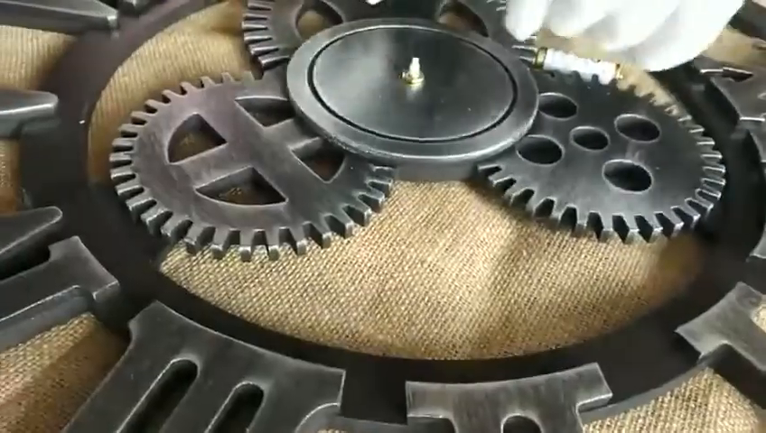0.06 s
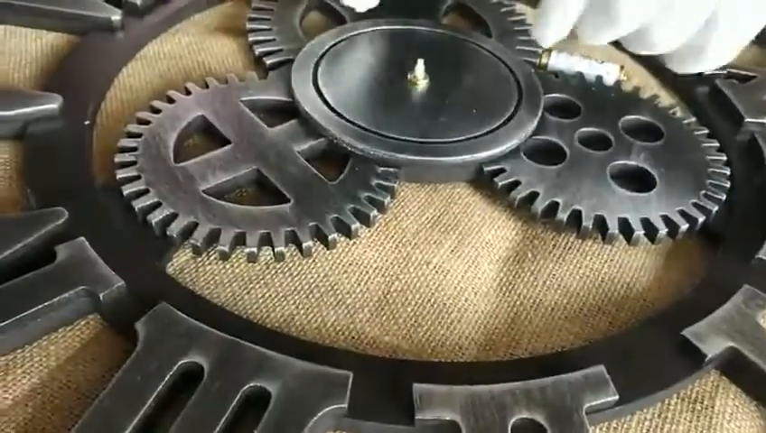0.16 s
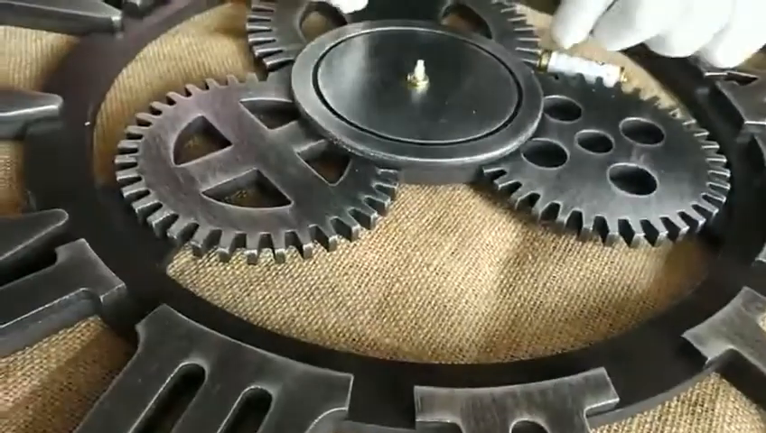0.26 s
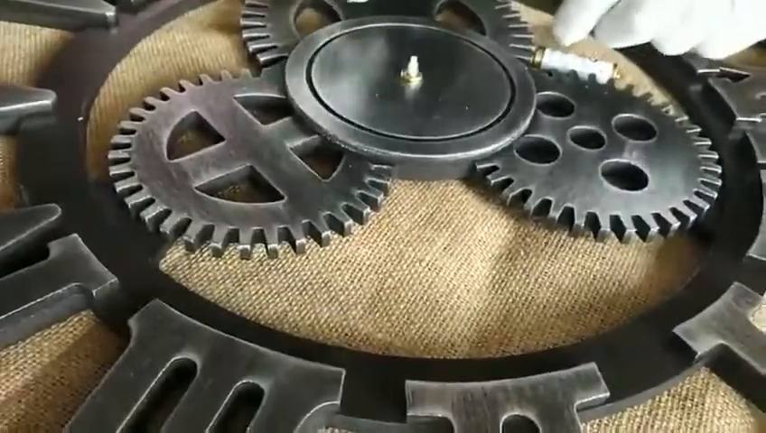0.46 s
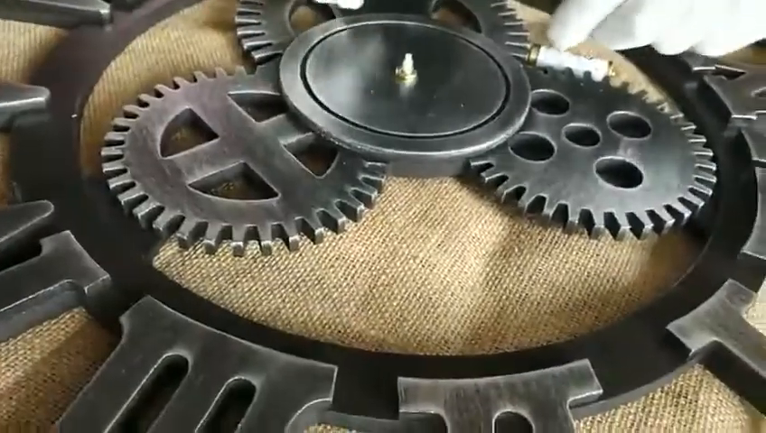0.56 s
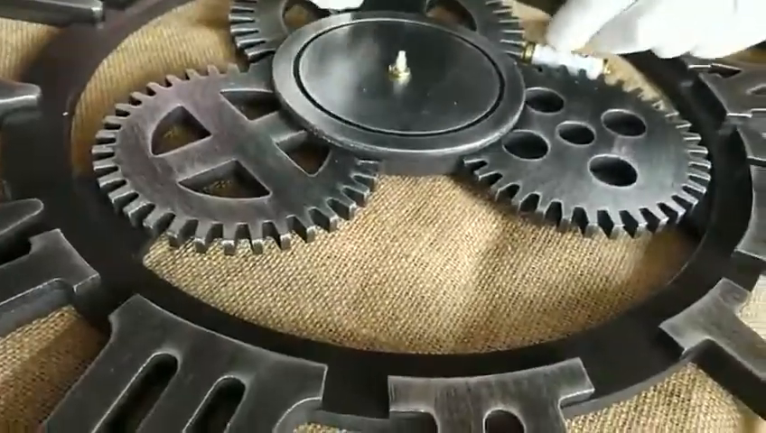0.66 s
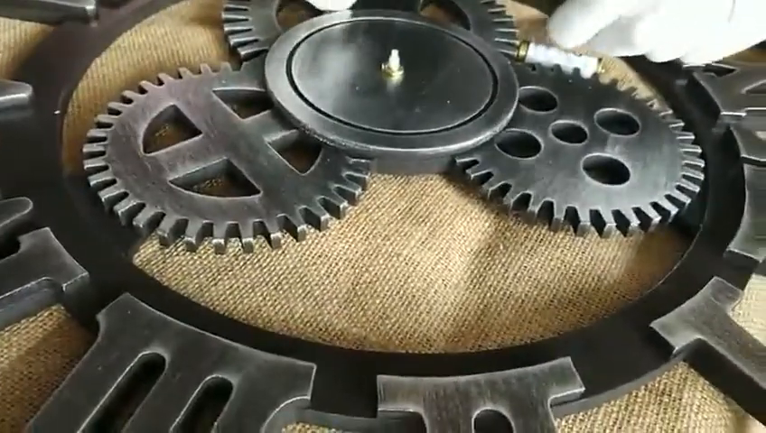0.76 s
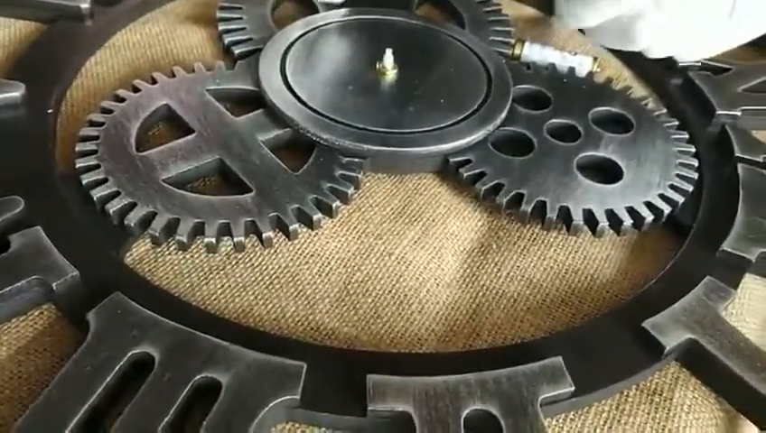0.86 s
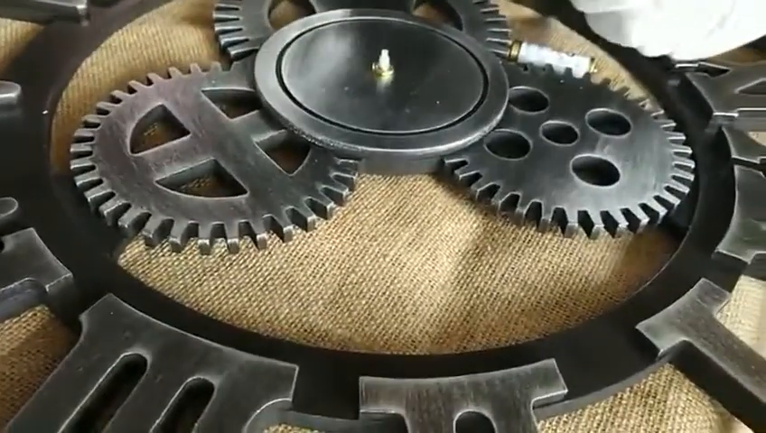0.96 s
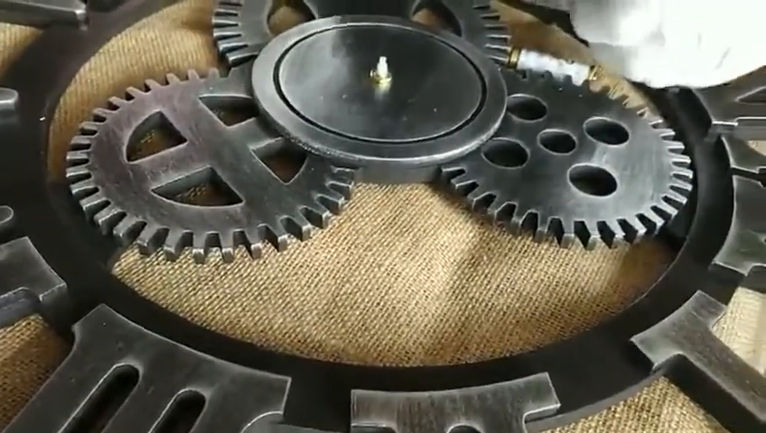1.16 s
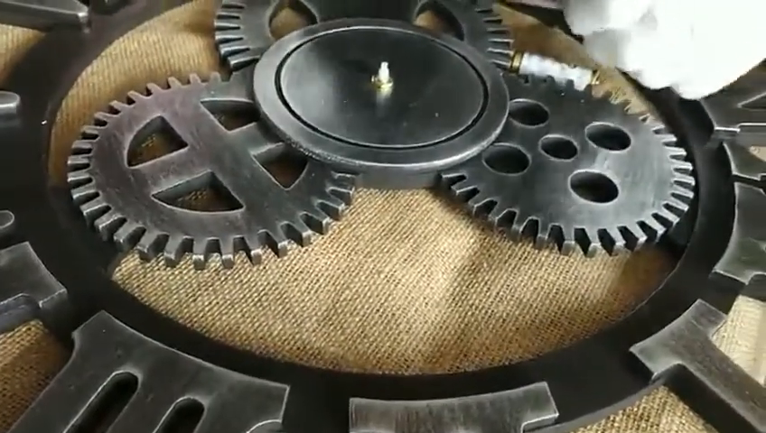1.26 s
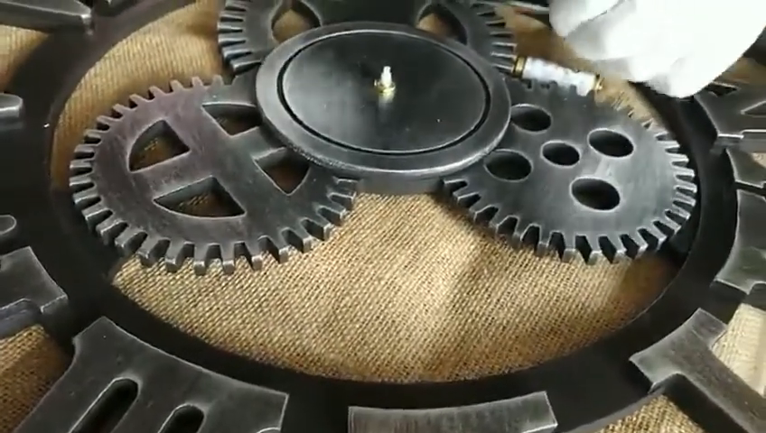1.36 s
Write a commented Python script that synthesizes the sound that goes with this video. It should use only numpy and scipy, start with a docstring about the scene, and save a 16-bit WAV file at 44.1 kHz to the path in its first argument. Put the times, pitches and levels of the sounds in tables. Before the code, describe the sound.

Metal gears handled up close: a dull bump, then a small ping, light ticks and clacks.

```python
"""Gloved hands work on a metal gear clock close to the microphone. The glove rubs over the gears,
a small metal part pings, metal scrapes on metal, and light ticks and firmer clacks ring the gears.
Just before the ping, something heavy bumps farther off, twice in quick succession, and the room answers.
Under it all runs the low rush of the quiet room's ventilation."""
import sys
import numpy as np
from scipy import signal
from scipy.fft import rfft, irfft, next_fast_len
from scipy.io import wavfile
from scipy.ndimage import map_coordinates

SR = 44100
rng = np.random.default_rng(int(sys.argv[2]) if len(sys.argv) > 2 else 0)


def generate_wav(sig):
    """Save sig (samples, or channels by samples) to the path in sys.argv[1] as 16-bit PCM at SR."""
    pcm = np.round(np.clip(np.atleast_2d(sig).T, -1, 1) * 32767).astype(np.int16)
    wavfile.write(sys.argv[1], SR, pcm)


N = 61739

# tone of the ventilation rush (frequency [Hz], relative level [dB])
AIR_TONE = [(25, -44), (60, -31.5), (120, -23), (150, -13.5), (195, 0), (260, -2), (300, -4), (380, -8.5),
            (470, -12), (650, -16), (1000, -21.5), (1700, -28), (2400, -29), (4000, -32), (8200, -33),
            (15000, -35)]
# how alike the rush is on both sides (frequency [Hz], likeness [0 to 1])
AIR_LIKENESS = [(50, 0.52), (120, 0.49), (180, 0.99), (300, 0.88), (440, 0.79), (650, 0.42), (1100, 0),
                (2000, 0), (8000, 0.023)]
# which side the ventilation leans to (frequency [Hz], left over right [dB])
AIR_BALANCE = [(60, -9), (110, -11.5), (190, -3.5), (300, -2), (440, -2.5), (700, -3.5), (2000, -3.5),
               (8000, 1)]
# faint fan tones (frequency [Hz], level [dB])
FAN_TONES = [(200, -60.5), (297, -62)]
# glove strokes (time [s], length [s], level [dB])
GLOVE_STROKES = [(-.01, 0.056, -66), (.12, 0.076, -65.5), (0.329, 0.022, -62), (0.367, 0.097, -59),
                 (0.444, 0.037, -53.5), (0.867, 0.23, -59.5), (1.295, 0.15, -55.5)]
# tone of cloth on metal (frequency [Hz], relative level [dB])
GLOVE_TONE = [(1200, -12), (2300, -3.5), (4000, -7), (7000, -10), (8500, 6.5), (9600, -8.5), (11000, 5.5),
              (12200, -17), (13500, 2.5), (15500, -16)]
# the heavy object's two bumps (time [s], level [dB], ring compared with the thud [dB])
BUMPS = [(0.215, -36.5, -10), (0.23, -34.5, 0)]
# tone of the thud (frequency [Hz], relative level [dB])
THUD_TONE = [(30, -42), (125, -43), (220, -4.5), (320, -0.5), (410, -18), (500, -11.5), (590, -18),
             (690, -8), (800, -16), (990, -14.5), (1120, -15), (1260, -10.5), (1500, -16), (1700, -25),
             (2700, -25.5), (5000, -37), (10000, -38.5), (15000, -56)]
# how long the thud hangs in the room (frequency [Hz], time to fade by 60 dB [s])
THUD_FADE = [(250, 0.79), (700, 0.7), (1400, 0.56), (3000, 0.48), (10000, 0.31)]
# how alike the thud is on both sides (frequency [Hz], likeness [0 to 1])
THUD_LIKENESS = [(200, 0.99), (400, 0.96), (700, 0.63), (1100, 0), (2000, 0), (8000, 0.045)]
# which side the bumps lean to (frequency [Hz], left over right [dB])
BUMP_BALANCE = [(100, 1), (200, -9.5), (300, 2.5), (480, -4), (700, -2), (2400, -5.5), (6000, 3.5)]
# notes the heavy object rings with (frequency [Hz], relative level [dB], fade time [s])
HEAVY_NOTES = [(499, -5, .15), (681.5, -6, 0.2), (979, 4, 0.051), (1277, -15, 0.12)]
# taps on the gears (time [s], level [dB], edge's left over right [dB], body's level offset [dB],
# body's main resonance [Hz], edge's fade time [s], relative ring level [dB])
GEAR_TAPS = [(0.4023, -32.5, 3, -13, 5200, .03, -28), (0.8639, -51.5, 7, -3.5, 4800, 0.021, -35),
             (0.9102, -51, 6, -7, 4750, 0.043, -20), (0.9357, -47.5, 9, -24, 4800, 0.042, -24),
             (0.9949, -44, 3, -1, 4550, 0.031, -29), (1.002, -50, 13, -12, 4600, 0.016, -28),
             (1.0066, -33, 11.5, -6.5, 4940, 0.012, -34), (1.024, -48, 9, -14, 4800, .018, -28),
             (1.0402, -49, 14, -14, 4800, 0.033, -24), (1.045, -36.5, 12, -16, 5400, 0.017, -35),
             (1.2098, -38, 12.5, 1.5, 2810, 0.014, -33), (1.2937, -33, 8.5, 1, 3800, 0.027, -18),
             (1.3285, -36.5, 9.5, 4.5, 2100, 0.025, -24)]
# tone of a tap's bright edge (frequency [Hz], relative level [dB])
EDGE_TONE = [(1500, -46), (4000, -18), (5700, -7), (8200, 1.5), (9500, -2), (11100, 2), (12200, -4),
             (14000, 1.5), (15200, -11), (16000, -5.5)]
# tone of a tap's fuller body (frequency [Hz], relative level [dB])
BODY_TONE = [(150, -37), (700, -1.5), (1300, -8), (1650, -9), (2100, -7), (2900, 2), (3300, -3), (3800, 1),
             (4400, -0.5), (5600, 3.5), (7000, -6), (9000, -8)]
# notes the gears ring with (frequency [Hz], relative level [dB], fade time [s])
GEAR_NOTES = [(1280, -1, .12), (2081, -5, .08), (2672, -5, .09), (4175, -6, .05), (5680, -5, .08),
              (7225, -6, .04), (8090, -9, .1), (10880, -7, .14), (12794, 1, .15), (14514, -2, .2)]
# notes the small part rings with (frequency [Hz], relative level [dB], fade time [s])
PART_NOTES = [(5710, -15, 0.011), (8090, -8, 0.023), (8235, -1, 0.031), (8670, -8, 0.035),
              (10170, -9, 0.022), (11020, 3, 0.014), (11800, -15, .018), (13600, -8, 0.026),
              (14200, -15, .02), (15300, -14, 0.023)]
# metal sliding on metal
# (time [s], length [s], level [dB], centre [Hz], half width [Hz], left over right [dB])
METAL_SCRAPES = [(0.491, 0.073, -60.5, 8300, 600, 1), (0.5027, 0.01, -52.5, 8570, 500, 7.5),
                 (0.786, 0.0079, -56, 3020, 280, 0), (1.331, 0.1, -61, 2560, 600, 3.5),
                 (1.345, .07, -73, 8500, 500, 10)]
# how far the left microphone opening leads the right (frequency [Hz], phase [radians])
MIC_PHASE = [(40, 1.4), (180, 1.58), (250, 0.94), (320, 0.86), (440, -0.12), (650, -0.69), (1100, -0.41),
             (2500, 0.1), (8000, 0.35)]


def amp(db):
    """Turn decibels into a number to multiply by."""
    return 10 ** (np.asarray(db) / 20)


def unit(x):
    """Scale a sound to an average (rms) strength of 1."""
    return x / np.sqrt(np.mean(x ** 2) + 1e-20)


def along(points, hz):
    """Read between the rows of a (frequency, value) table, on a log frequency scale."""
    freqs, values = np.transpose(points)
    return np.interp(np.log(hz + 1), np.log(freqs + 1), values)


def since(start):
    """Seconds since the start time, zero before it."""
    return np.maximum(np.arange(N) / SR - start, 0)


def pan(db):
    """Left and right gains; positive decibels lean left."""
    return amp(np.array([[.5], [-.5]]) * db)


def filtered(x, response):
    """Multiply each frequency in a sound by response(hz)."""
    size = next_fast_len(N + SR // 2)
    return irfft(rfft(x, size) * response(np.fft.rfftfreq(size, 1 / SR)), size)[..., :N]


def noise(tone, likeness):
    """Stereo noise with a given tone; likeness (number or table) says how alike the sides are."""
    def response(hz):
        alike = np.full_like(hz, likeness) if np.isscalar(likeness) else along(likeness, hz)
        spread = np.arccos(np.clip(alike, -1, 1)) / 2
        return amp(along(tone, hz)) * [np.cos(spread), np.sin(spread)]
    mid, side = filtered(rng.standard_normal((2, N)), response)
    return unit(np.array([mid + side, mid - side]))


def struck(start, fade_s, rise_s):
    """Loudness after a hit: a quick rise, then a fall of 60 dB every fade_s seconds."""
    t = since(start)
    return (1 - np.exp(-t / rise_s)) * np.exp(-np.log(1000) * t / fade_s)


def stroke(start, length):
    """A smooth swell and fade."""
    return np.sin(np.pi * np.minimum(since(start) / length, 1))


def ring(notes, start, rise_s=.0003):
    """A struck object's fading notes, a little different on every hit."""
    draws = zip(rng.standard_normal(len(notes)), rng.random(len(notes)))
    out = np.zeros(N)
    for (hz, db, fade_s), (nudge, phase) in zip(notes, draws):
        wave = np.sin(2 * np.pi * (hz * since(start) + phase))
        out += amp(db + .5 * nudge) * struck(start, fade_s, rise_s) * wave
    return out


def wander(rate_hz, points=N):
    """A smooth random curve that passes rate_hz random points each second."""
    return map_coordinates(rng.standard_normal(points), [since(0) * rate_hz])


def grain(depth_db=3.5):
    """The fast, uneven flutter in loudness that friction makes."""
    return unit(amp(depth_db * wander(rate_hz=288)))


def ventilation(rush_db=-51.5, waver_radians=.77):
    """Moving air makes a steady low rush and a thin hiss; the fan adds two faint, wavering tones."""
    hum = np.zeros(N)
    for hz, db in FAN_TONES:
        waver = waver_radians * wander(rate_hz=7.19, points=64)
        hum += amp(db) * np.sqrt(2) * np.sin(2 * np.pi * hz * since(0) + waver)
    rush = amp(rush_db) * noise(AIR_TONE, AIR_LIKENESS)
    return filtered(rush + hum, lambda hz: pan(along(AIR_BALANCE, hz)))


def glove_rubs():
    """Cloth drags over the gears: a grainy hiss that swells with each stroke."""
    pressure = sum(amp(db) * stroke(start, length) for start, length, db in GLOVE_STROKES)
    return pan(db=6.5) * pressure * grain() * noise(GLOVE_TONE, likeness=.073)


def room_echo(near, level_db=-22):
    """The room sends the near sounds back as a short, blurred echo."""
    tail = rng.standard_normal((2, N)) * struck(.0048, fade_s=.25, rise_s=.004)
    tail /= np.linalg.norm(tail[0])
    return amp(level_db) * signal.fftconvolve(near.mean(0)[None], tail, axes=1)[:, :N]


def heavy_bumps(low_cut_hz=162):
    """Two dull bumps ring a heavy object; the room answers, its high sounds dying first."""
    out = np.zeros((2, N))
    for start, db, ring_db in BUMPS:
        hz, t, spectrum = signal.stft(noise(THUD_TONE, THUD_LIKENESS), SR, nperseg=1024)
        fade = np.exp(-np.log(1000) * np.maximum(t - start, 0) / along(THUD_FADE, hz)[:, None])
        thud = signal.istft(spectrum * fade, SR, nperseg=1024)[1][:, :N]
        onset = 1 - np.exp(-since(start) / .001)
        out += amp(db) * (thud * onset + amp(ring_db) * ring(HEAVY_NOTES, start))
    out = signal.sosfilt(signal.butter(4, low_cut_hz, "high", fs=SR, output="sos"), out)
    return filtered(out, lambda hz: pan(along(BUMP_BALANCE, hz)))


def boom(start=.2155, rise_s=.036, fade_s=.081, level_db=-21):
    """The low tone of the bumps swells, sinks in pitch and dies away."""
    first_hz, last_hz, sink_hz_per_s = 368.4, 258, 2850
    t = since(start)
    hz = np.maximum(first_hz - sink_hz_per_s * t, last_hz)
    swell = np.minimum(t / rise_s, 1) ** .6
    fade = np.exp(-np.log(1000) * since(start + rise_s) / fade_s)
    return amp(level_db) * swell * fade * np.sin(2 * np.pi * np.cumsum(hz * (t > 0)) / SR)


def gear_taps():
    """Each tick or clack has a bright edge, a slower hollow body and a faint ring of the gears."""
    rise_s, graze_s, graze_db = .00041, .003, -17
    ripple_db, ripple_step_hz = 2.5, 130
    body_db, body_times_longer, peak_db, peak_half_width_hz = -5, 1.92, 9, 330
    out = np.zeros((2, N))
    for start, db, pan_db, body_offset_db, body_hz, fade_s, ring_db in GEAR_TAPS:
        # every spot that is touched brings out different resonances
        heights = rng.standard_normal(SR // 50)
        ripple = lambda hz: amp(ripple_db * map_coordinates(heights, [hz / ripple_step_hz]))
        hollow = lambda hz: ripple(hz) * amp(peak_db / (1 + ((hz - body_hz) / peak_half_width_hz) ** 2))
        # the surfaces brush each other just before they meet
        graze = amp(graze_db) * stroke(start - graze_s, 2 * graze_s) ** 2
        edge = unit(filtered(noise(EDGE_TONE, likeness=.15), ripple))
        edge *= graze + struck(start, fade_s, rise_s)
        body = unit(filtered(noise(BODY_TONE, likeness=.15), hollow))
        body *= graze + struck(start, fade_s * body_times_longer, rise_s)
        body_and_ring = amp(body_db + body_offset_db) * body + amp(ring_db) * ring(GEAR_NOTES, start)
        out += amp(db) * (pan(pan_db) * edge + pan(.5 * pan_db) * body_and_ring)
    return out


def ping():
    """A small held part touches metal and rings briefly, on the left."""
    return amp(db=-23.5) * pan(db=15) * ring(PART_NOTES, start=.4029, rise_s=.0035)


def metal_scrapes():
    """Metal slides on metal: short, grainy hisses, each gathered around one pitch."""
    out = np.zeros((2, N))
    for start, length, db, centre_hz, half_width_hz, pan_db in METAL_SCRAPES:
        peak = lambda hz: 1 / (1 + ((hz - centre_hz) / half_width_hz) ** 2)
        hiss = unit(filtered(rng.standard_normal((2, N)), peak))
        out += amp(db) * pan(pan_db) * stroke(start, length) * grain() * hiss
    return out


def scene():
    """The close work on the clock and its echo, the far bumps and the ventilation."""
    near = ping() + gear_taps() + glove_rubs() + metal_scrapes()
    return near + room_echo(near) + heavy_bumps() + boom() + ventilation()


def record(dry, top_hz=15480):
    """The microphone's two openings hear the waves slightly out of step; the highest treble is cut."""
    shifted = filtered(dry, lambda hz: np.exp(.5j * along(MIC_PHASE, hz) * np.array([[1], [-1]])))
    return filtered(shifted, lambda hz: 1 / np.sqrt(1 + (hz / top_hz) ** 200))


dry = scene()
out = record(dry)
generate_wav(out)
```